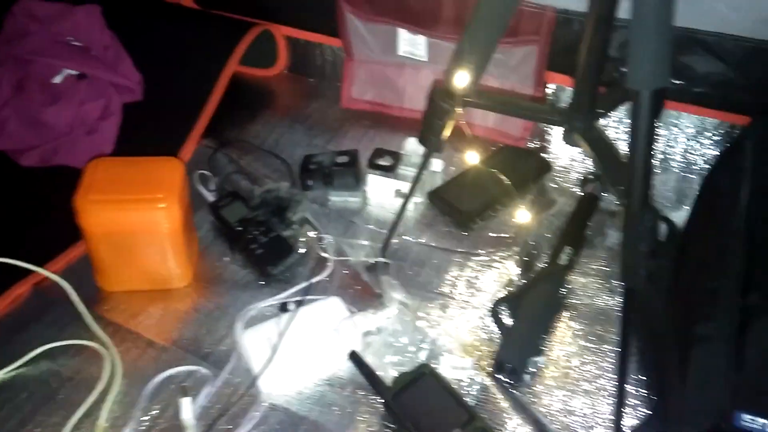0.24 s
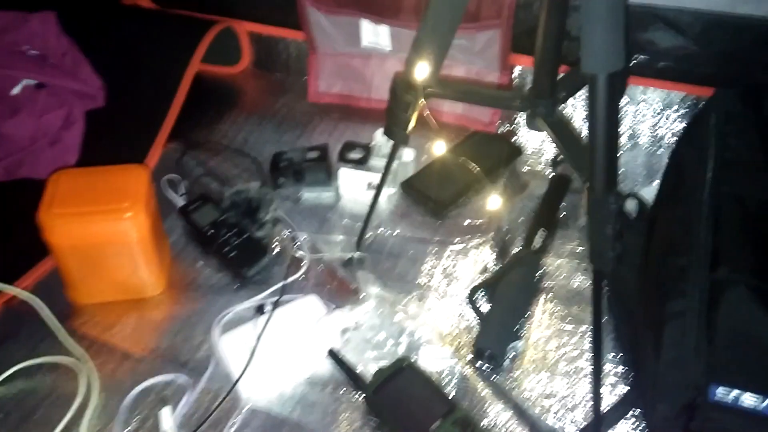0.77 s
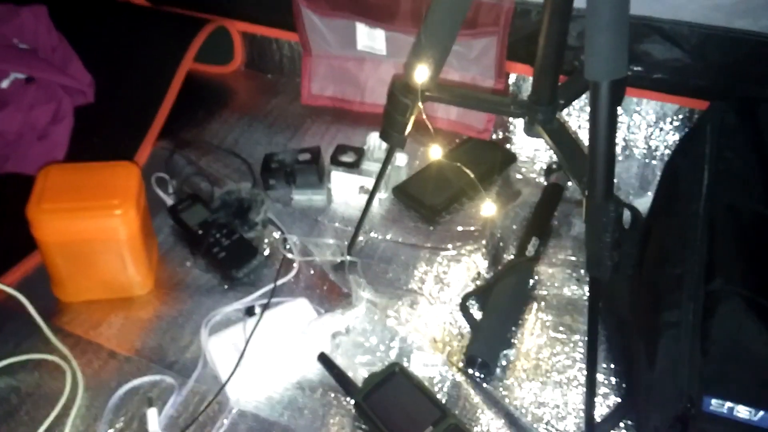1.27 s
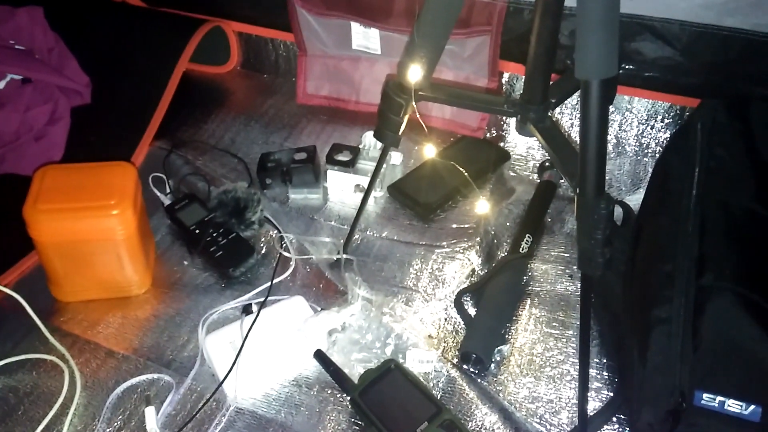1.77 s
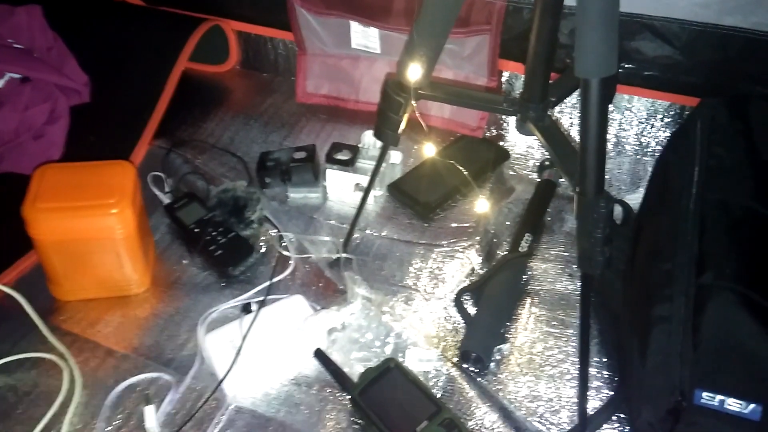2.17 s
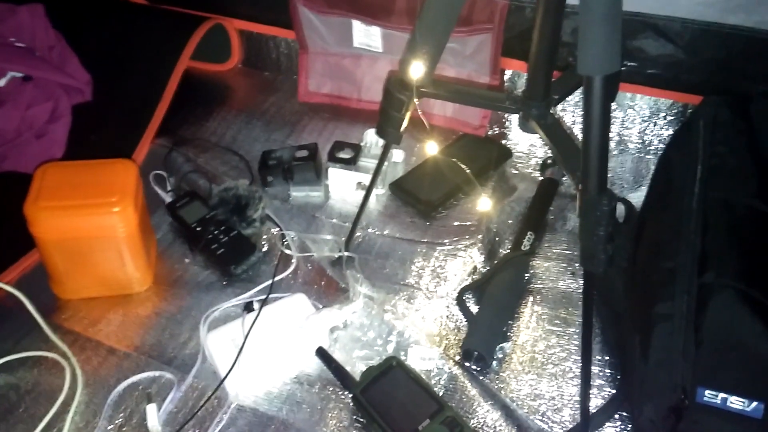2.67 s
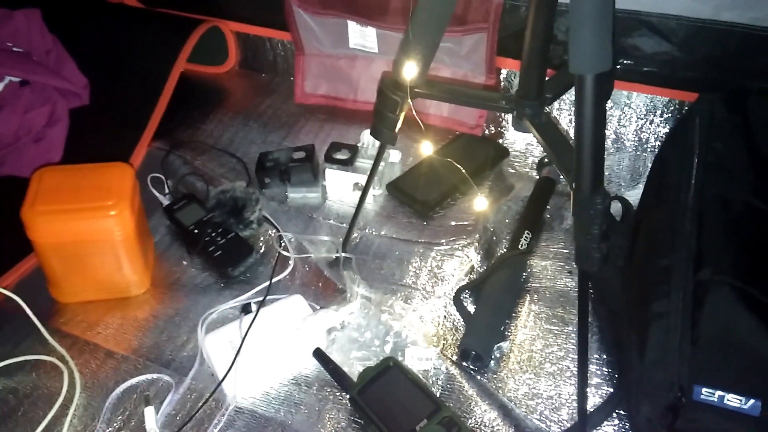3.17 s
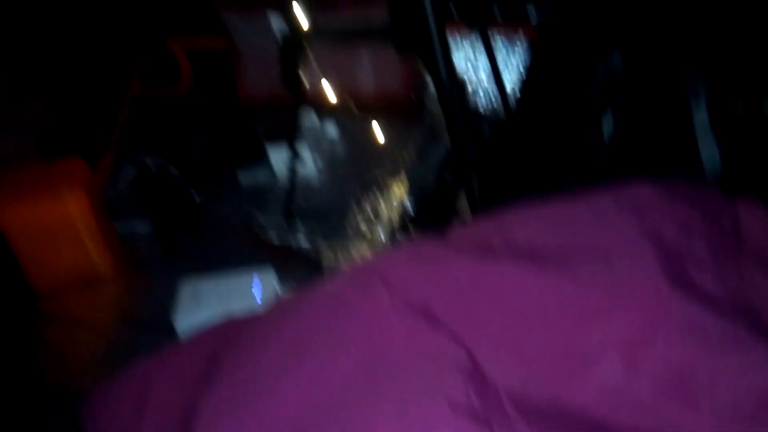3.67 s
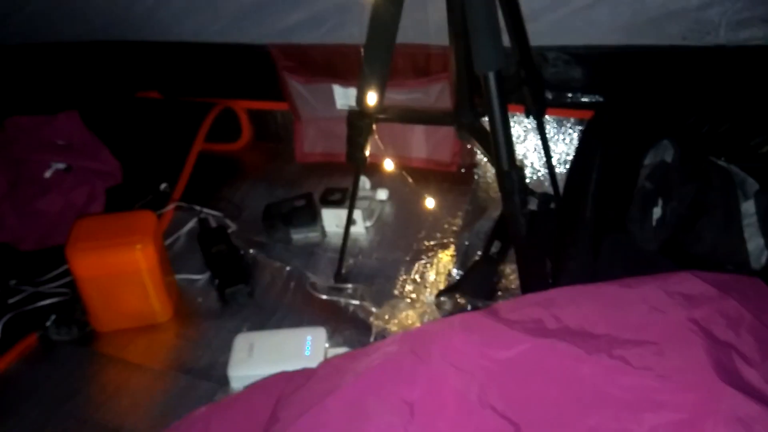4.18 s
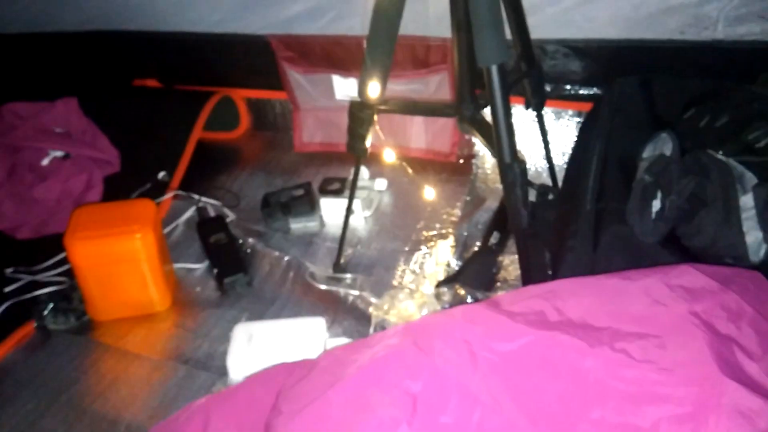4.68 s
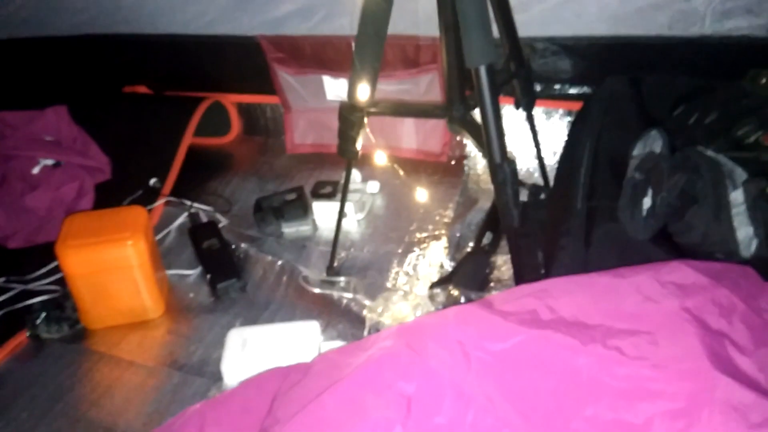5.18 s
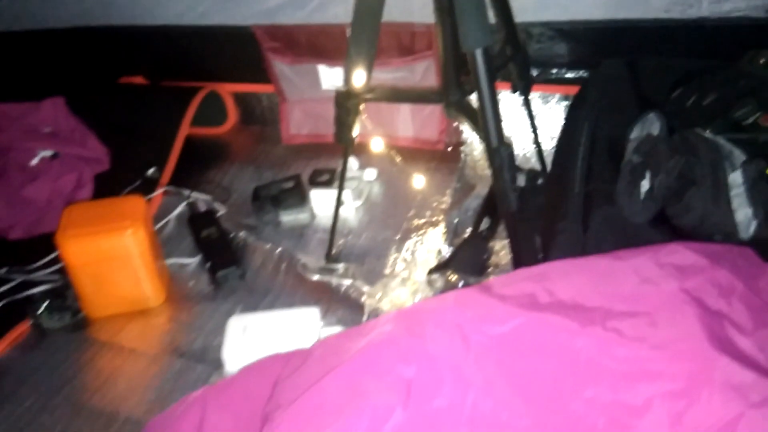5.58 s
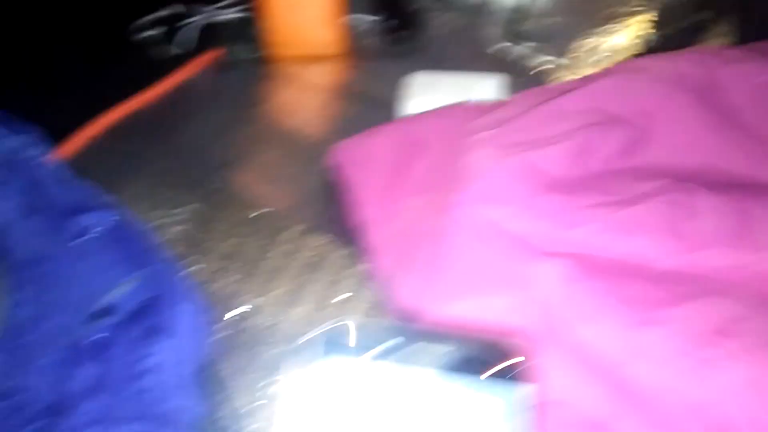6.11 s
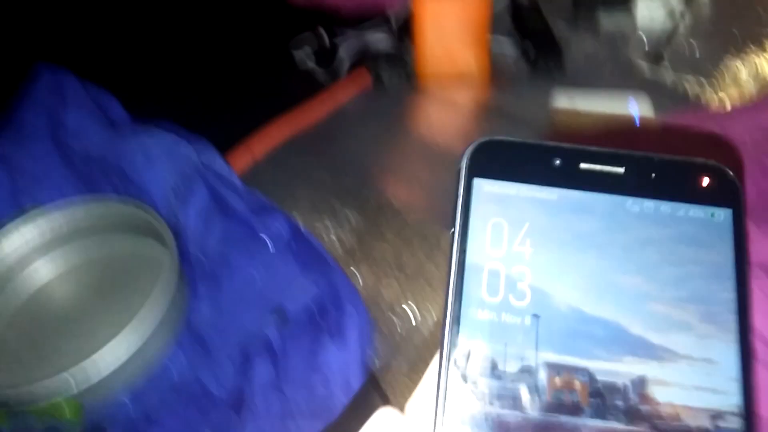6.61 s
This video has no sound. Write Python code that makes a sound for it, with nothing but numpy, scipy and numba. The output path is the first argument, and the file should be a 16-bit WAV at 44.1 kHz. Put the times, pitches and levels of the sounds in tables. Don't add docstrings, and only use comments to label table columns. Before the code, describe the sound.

Inside a tent, dense rain patters with thick drips; after a silent gap, muffled hissing rain continues under clicks from a shifting hand.

```python
import sys
import numpy as np
from scipy import signal
from scipy.io import wavfile
from numba import njit

SR = 44100
rng = np.random.default_rng(int(sys.argv[2]) if len(sys.argv) > 2 else 0)


def voltage_ratio(level):
    return 10 ** (np.asarray(level, float) / 20)


def transcribe(u):
    v = np.clip(np.atleast_2d(u).T, -1, 1)
    q = np.round(v * 32767).astype(np.int16)
    wavfile.write(sys.argv[1], SR, q)


N = 302085
CUT_S, BACK_S = 3.4105, 3.9328
BASS_TOP_HZ, DRUM_TOP_HZ = 190, 1150
OPEN_PORT_HZ = 7480
TOP_HZ = 14280

# time in seconds, splash level in dB.
RAIN_STRENGTH = [
    (0, -26.5),
    (0.14, -30),
    (0.5, -30.5),
    (1.13, -32.5),
    (1.4, -31),
    (1.9, -30.5),
    (2.6, -32.5),
    (3.2, -32.5),
    (3.4, -29.5),
]
# start in seconds, lift of the splash in dB, lift of the drumming in dB.
RAIN_SHEETS = [(0.0, -5, 4.5), (0.12, -3, 8.5), (0.24, 2.5, -5.5), (0.38, 3.5, 3), (0.57, 0.5, 3.5),
               (0.781, 1.5, 5.5), (1.0, 0, 1), (1.2, 3.5, 1.5), (1.32, 3.5, -1), (1.42, 1.5, 3),
               (1.535, 0.5, 0), (1.62, 3, 5), (1.7, -2, 3), (1.939, 1.5, 3.5), (2.065, 0.5, -1),
               (2.23, 1.5, 5.5), (2.33, 2.5, -0.5), (2.49, 2.5, 0.5), (2.7, 5.5, 2), (2.77, 4, -0.5),
               (2.971, 5.5, -1.5), (3.11, 2, 1), (3.27, 3.5, 3), (3.36, 0.5, -1.5)]
# pitch in Hz, level in dB per Hz.
TAUT_FABRIC = [(24, -45), (40, -26.5), (70, -8.5), (189, -16.5), (312, 2.5), (410, -8.5), (585, 1),
               (802, -2.5), (989, -1.5), (1270, -10.5), (2880, -12.5), (4030, -16), (6000, -37),
               (7800, -42), (13200, -120)]
# time in seconds, peak in dB.
SPLATS = [(0.1635, -21), (0.227, -12), (0.4525, -17), (0.567, -12.5), (0.6883, -27), (0.827, -16),
          (0.8744, -15.5), (1.0113, -25), (1.073, -13.5), (1.1858, -30), (1.377, -14), (1.627, -12.5),
          (1.8282, -22), (1.919, -23), (1.9454, -14.5), (2.0587, -12), (2.1201, -20), (2.359, -24),
          (2.4936, -18), (2.6938, -10.5), (2.9647, -15), (3.1203, -13.5), (3.269, -10.5), (4.0153, -33),
          (4.0383, -38), (4.187, -18), (4.7046, -28), (6.159, -23), (6.2382, -22), (6.675, -17)]
# time in seconds, pitch in Hz, level in dB.
SINGING_STRIPS = [(0.13, 2930, -37.5), (0.41, 2370, -41.5), (0.63, 1720, -35.5), (0.8, 900, -32),
                  (0.93, 2590, -41.5), (1.22, 4700, -41), (1.43, 741, -34), (1.55, 2970, -41.5),
                  (1.64, 3600, -39), (1.7, 958, -41), (1.85, 2780, -42.5), (2.25, 2530, -42.5),
                  (2.48, 2130, -39), (2.7, 1936, -40), (2.78, 955, -37.5), (3.18, 1082, -37.5),
                  (3.3, 2605, -38.5), (3.38, 970, -36.5)]
# time in seconds, peak in dB, pitch in Hz.
HEAVY_DRIPS = [(0.088, -27, 369), (0.158, -13, 550), (0.45, -8, 387), (0.631, -7, 1690), (1.305, -5.5, 590),
               (1.42, -9, 716), (1.531, -3.5, 655), (1.611, -14.5, 322), (1.916, -9, 487), (2.231, -7, 463),
               (2.325, -26, 627), (2.46, -12, 975), (2.538, -7.5, 676), (2.729, -9, 576), (2.775, -25, 961),
               (2.94, -17, 320)]
# time in seconds, splash level in dB, port pitch in Hz.
HISSING_RAIN = [(3.95, -31, 6080), (4.4, -31, 6450), (4.83, -29.5, 6530), (5.11, -30.5, 6750),
                (5.19, -33, 6500), (5.37, -36, 6800), (5.72, -35, 6900), (5.9, -35.5, 6660),
                (6.1, -35.5, 6850), (6.14, -29, 6900), (6.41, -30.5, 6730), (6.85, -31.5, 6900)]
# pitch in Hz, level in dB per Hz.
MUFFLED_FABRIC = [(24, -33), (40, 1.5), (75, 2), (243, -8), (306, -14), (611, -17), (769, -12), (2340, -8),
                  (4290, -5), (6000, -5.5), (7800, -34), (13200, -120)]
# pitch in Hz, level in dB per Hz.
COVERED_FABRIC = [(24, -31), (40, -4), (81, -4), (402, -22), (844, -16.5), (1200, -23), (2360, -19.5),
                  (3420, -21), (4960, -20), (5500, -27.5), (7150, -41), (12100, -120)]
COVER_S = (5.1, 5.23)
# time in seconds, peak in dB, fall in ms.
POPS = [(4.044, -9, 0.077), (4.177, -15, 0.14), (4.316, -14, 0.086), (4.445, -17, 0.1),
        (4.562, -14.5, 0.097), (4.567, -20, 0.15), (4.692, -15, 0.1), (4.746, -29, 0.2), (4.833, -16, 0.22),
        (4.976, -13, 0.079), (5.134, -17, 0.14), (5.334, -23.5, 0.28), (5.339, -32, 0.2),
        (5.562, -21.5, 0.25), (5.567, -28, 0.35), (5.575, -27, 0.23), (5.594, -29, 0.62),
        (5.646, -32, 0.27), (5.729, -36, 0.29), (5.806, -23.5, 0.35), (5.817, -33, 0.18),
        (5.86, -26.5, 0.4), (6.119, -35, 0.5), (6.666, -37, 0.14), (6.778, -29, 0.1)]
# start in seconds, end in seconds, peak in dB, slips per second.
FLUTTERS = [
    (4.187, 4.195, -19, 1020),
    (4.32, 4.331, -25.5, 980),
    (4.452, 4.456, -23.5, 1360),
    (4.569, 4.578, -20, 1240),
    (4.847, 4.851, -23, 610),
    (4.995, 5.009, -20.5, 480),
    (5.177, 5.189, -30.5, 870),
    (5.727, 5.735, -44, 690),
]
# time in seconds, peak in dB, fall in ms.
SUCKS = [(4.548, -32, 1.2), (4.641, -40, 0.9), (4.652, -32, 1.5), (4.706, -23.5, 0.99), (4.98, -29, 0.88),
         (5.176, -22, 0.22), (5.209, -28.5, 0.81), (5.351, -35, 2.2), (5.421, -29.5, 1.3),
         (5.589, -27, 0.89), (5.604, -27, 1.1), (5.657, -32, 1.7), (5.821, -29, 0.8), (5.892, -31, 0.96),
         (5.964, -29.5, 1.1), (6.185, -32, 0.8), (6.319, -31, 0.86)]
# time in seconds, peak in dB, fall in ms.
PRESSES = [(5.937, -32, 1.4), (6.044, -34.5, 1.6), (6.105, -36, 1.6), (6.168, -34, 1.1), (6.25, -34, 1.3),
           (6.302, -39, 1.3), (6.441, -38, 1.8), (6.554, -34.5, 2.4), (6.611, -32.5, 2.1),
           (6.664, -34, 2.2)]


def in_time(rows):
    s, *columns = np.transpose(rows)
    return [np.interp(np.arange(N) / SR, s, c) for c in columns]


def rms_one(x):
    return x / np.sqrt(np.mean(x ** 2) + 1e-20)


def drift(rate_hz):
    r = np.exp(-2 * np.pi * 40 * rate_hz / SR)
    noise = rng.standard_normal(N // 40 + 2002)
    slow = signal.lfilter([1], [1, -2 * r, r * r], noise)[2000:]
    return np.interp(np.arange(N) / 40, np.arange(len(slow)), rms_one(slow))


def drops(per_s, spread_db):
    size_db = spread_db * np.minimum(rng.exponential(1, N), 4)
    sizes = voltage_ratio(size_db) * rng.choice([-1, 1], N)
    return sizes * (rng.random(N) < per_s / SR) + 1e-18


def butter(x, hz, kind, order=2):
    return signal.sosfilt(signal.butter(order, hz, kind, fs=SR, output="sos"), x)


def ring(hits, hz, cycles):
    r = voltage_ratio(-60 * hz / (cycles * SR))
    w = 2 * np.pi * hz / SR
    return signal.lfilter([np.sin(w)], [1, -2 * r * np.cos(w), r * r], hits + 1e-18)


@njit
def resonate(x, hz, r, sr):
    y = np.zeros(len(x))
    for i in range(2, len(x)):
        y[i] = x[i] + 2 * r * np.cos(2 * np.pi * hz[i] / sr) * y[i - 1] - r * r * y[i - 2]
    return y


def gusts():
    t = np.arange(N) / SR
    rise_s, fall_s = 0.0032, 0.064
    splash_db, heavy_db = in_time(RAIN_STRENGTH)[0], 0
    for s, lift_db, drum_db in RAIN_SHEETS:
        since = np.maximum(t - s, 0)
        sheet = (1 - np.exp(-since / rise_s)) * np.exp(-since / fall_s)
        splash_db = splash_db + lift_db * sheet
        heavy_db = heavy_db + drum_db * sheet
    return splash_db, heavy_db


def fabric(spectrum, per_s, cycles, patchy_db):
    hits, groups = drops(per_s, spread_db=3.0), np.zeros((3, N))
    pitches = 45 * (1 + np.arange(40) / 4.2) ** 2.06
    share = pitches ** .3 / np.sum(pitches ** .3)
    dealt = rng.choice(len(pitches), N, p=share)
    table_hz, table_db = np.transpose(spectrum)
    for k, hz in enumerate(pitches):
        rings = ring(hits * (dealt == k), hz, cycles * (hz / 1000) ** 0.67)
        rings = rms_one(np.diff(rings, prepend=0))
        level_db = np.interp(np.log(hz), np.log(table_hz), table_db)
        wetting_db = patchy_db * min(hz / 1200, 1) ** 0.19 * drift(5.2)
        group = int(hz > BASS_TOP_HZ) + int(hz > DRUM_TOP_HZ)
        groups[group] += rings * hz ** 0.11 * voltage_ratio(level_db + wetting_db)
    return [rms_one(g) for g in groups]


def bursts(spray, fall_s, over_db, crack_db):
    kicks = np.zeros(N)
    for s, db in SPLATS:
        kicks[round(s * SR)] = voltage_ratio(db + over_db)
    scatter = signal.lfilter([1], [1, -np.exp(-1 / (fall_s * SR))], kicks)
    return spray * (1 + scatter) + voltage_ratio(crack_db) * kicks ** 2


def rain(splash_db, port_hz, spectrum, per_s, cycles, bass_db, drum_db, patter_db, follows, sway_db, patchy_db,
         width_hz, edge_hz, top_hz, sizzle_db):
    bass, drum, patter = fabric(spectrum, per_s, cycles, patchy_db)
    fine_drops = drops(20000, spread_db=2.5) * voltage_ratio(0.92 * drift(25))
    spray = bursts(fine_drops, fall_s=0.012, over_db=11.0, crack_db=27.0)
    port = resonate(spray, port_hz, np.exp(-np.pi * width_hz / SR), SR)
    splash = rms_one(butter(butter(port, edge_hz, "high", order=5), top_hz, "low"))
    sizzle = rms_one(butter(spray, 11000, "high", order=3))
    sizzle *= voltage_ratio(sizzle_db + patchy_db / 2 * drift(3))
    gust_db = follows * (splash_db + 31)
    low = voltage_ratio(bass_db) * bass
    low = low + voltage_ratio(drum_db + gust_db + sway_db * drift(13)) * drum
    low = low + voltage_ratio(patter_db + gust_db) * patter
    return low + voltage_ratio(splash_db) * (splash + sizzle)


def singing_strips():
    out, hits = np.zeros(N), drops(1500, spread_db=6.0)
    reach = round(.11 * SR)
    for s, hz, db in SINGING_STRIPS:
        start = max(round(s * SR) - reach, 0)
        end = start + 2 * reach
        t = np.arange(start, end) / SR
        own_hits = np.roll(hits, round(hz))[start:end]
        rings = rms_one(ring(own_hits, hz, 30.0))
        out[start:end] += voltage_ratio(db + 0.5) * rings * np.exp(-((t - s) / 0.048) ** 2)
    return out


def heavy_drips():
    out = np.zeros(N)
    for s, db, hz in HEAVY_DRIPS:
        i = round(s * SR)
        out[i:i + 2000] += voltage_ratio(db - 13.0) * ring(np.arange(2000) == 0, hz, 9.2)[:N - i]
    return out


def add_push(out, s, height, fall_ms):
    t_ms = np.arange(round(.03 * SR)) / SR * 1000
    fall = np.exp(-t_ms / (1.68 * max(fall_ms, .06)))
    push = fall - np.exp(-t_ms / (0.02 + 0.31 * fall_ms))
    i = round(s * SR)
    out[i:i + len(t_ms)] += (height * push / push.max())[:N - i]


def add_flutter(out, start, end, db, per_s):
    chance = rng.random((24, 3))
    times = start + (np.cumsum(.5 + chance[:, 0]) - .5 - chance[0, 0]) / per_s
    for k, (s, (_, size, soft)) in enumerate(zip(times, chance)):
        swell_db = 6 * (s - end) / (end - start)
        if s < end:
            height = voltage_ratio(db + 5 + swell_db - 4.2 * size) * (-1) ** k
            add_push(out, s, height, 0.033 + 0.19 * soft ** 2)
    suck_db = -28.5 + 0.3 * (db + 28.5)
    add_push(out, end, -voltage_ratio(suck_db), fall_ms=1.08)


def low_cut(x, hz, q):
    w = 2 * np.pi * hz
    return signal.lfilter(*signal.bilinear([1, 0, 0], [1, w / q, w * w], SR), x)


def rustle(pushes, level_db, fall_s):
    fade = np.exp(-1 / (fall_s * SR))
    pressure = signal.lfilter([1], [1, -fade], np.abs(pushes)) / (fall_s * SR)
    rubbing = rms_one(butter(drops(2500, spread_db=2.5), [250, 1000], "band"))
    return voltage_ratio(level_db) * pressure * rubbing


def hand():
    out = np.zeros(N)
    for s, db, fall_ms in POPS + PRESSES:
        add_push(out, s, voltage_ratio(db), fall_ms)
    for s, db, fall_ms in SUCKS:
        add_push(out, s, -voltage_ratio(db), fall_ms)
    for start, end, db, per_s in FLUTTERS:
        add_flutter(out, start, end, db, per_s)
    pushes = low_cut(low_cut(out, 56, 2.06), 27, 0.99)
    return pushes + rustle(out, level_db=-7, fall_s=0.0071)


def scene():
    t = np.arange(N) / SR
    splash_db, heavy_db = gusts()
    open_port = np.full(N, float(OPEN_PORT_HZ))
    first = rain(splash_db, open_port, TAUT_FABRIC, per_s=6000, cycles=31.0, bass_db=-47.5,
                 drum_db=heavy_db - 34.0, patter_db=-37.5, follows=0.45, sway_db=0.86, patchy_db=1.5,
                 width_hz=890, edge_hz=4500, top_hz=8540, sizzle_db=-34.5)
    first = first + heavy_drips() + singing_strips()
    bare = rain(*in_time(HISSING_RAIN), MUFFLED_FABRIC, per_s=14000, cycles=8.5, bass_db=-45.5,
                drum_db=-48.0, patter_db=-38.5, follows=0.42, sway_db=-0.8, patchy_db=2.5,
                width_hz=1320, edge_hz=4940, top_hz=10600, sizzle_db=-14.5)
    covered = rain(*in_time(HISSING_RAIN), COVERED_FABRIC, per_s=14000, cycles=28.0, bass_db=-54.0,
                   drum_db=-53, patter_db=-49, follows=0.79, sway_db=1.6, patchy_db=1.4,
                   width_hz=1340, edge_hz=6660, top_hz=15050, sizzle_db=-32)
    cover = np.interp(t, COVER_S, [0, np.pi / 2])
    second = np.cos(cover) * bare + np.sin(cover) * covered + hand()
    mono = np.where(t < (CUT_S + BACK_S) / 2, first, second)
    return np.array([mono, mono])


def low_pass(x):
    return signal.sosfilt(signal.butter(12, 15600, fs=SR, output="sos"), x)


def record(dry):
    t = np.arange(N) / SR
    top_cut = signal.ellip(14, .5, 70, TOP_HZ, fs=SR, output="sos")
    heard = signal.sosfilt(top_cut, butter(dry, 33, "high"))
    running = np.clip((CUT_S - t) / .0002, 0, 1) + np.clip((t - BACK_S) / .0015, 0, 1)
    return low_pass(heard * running)


dry = scene()
out = record(dry)
transcribe(out)
```